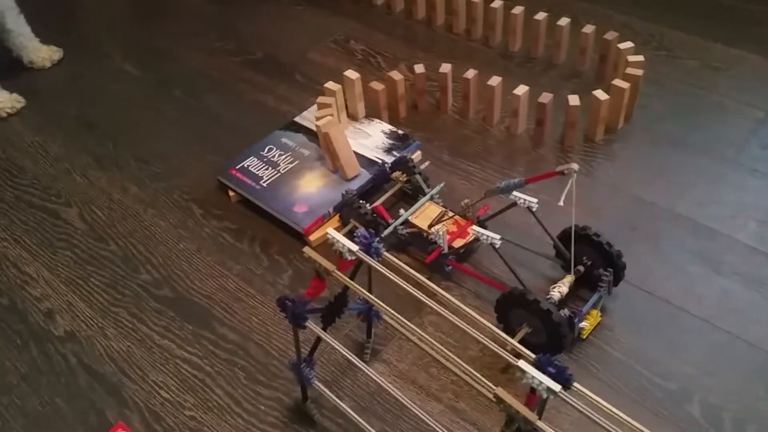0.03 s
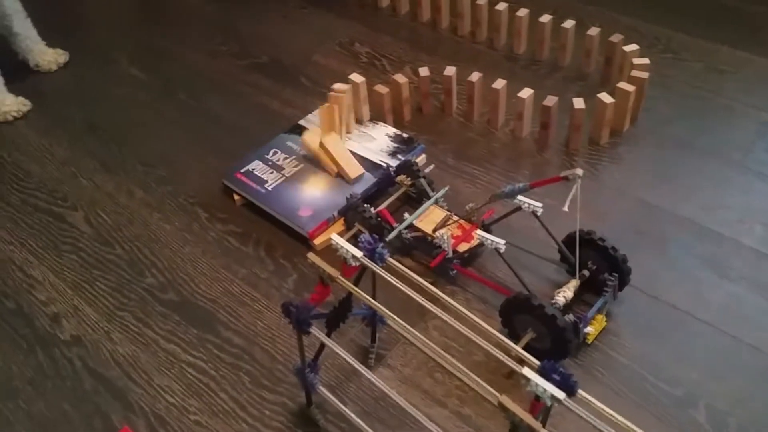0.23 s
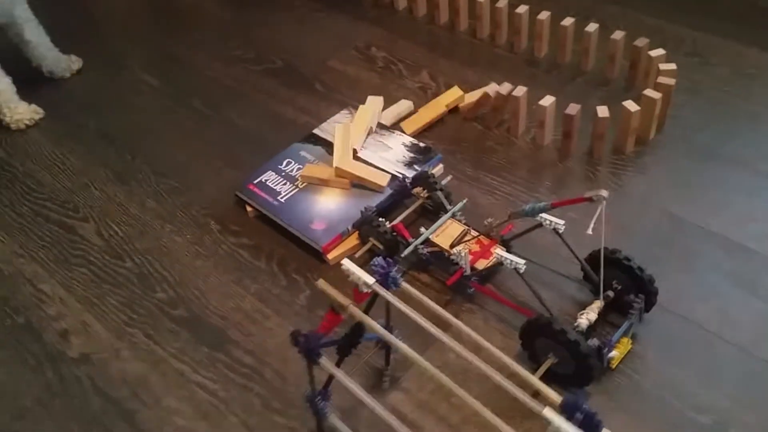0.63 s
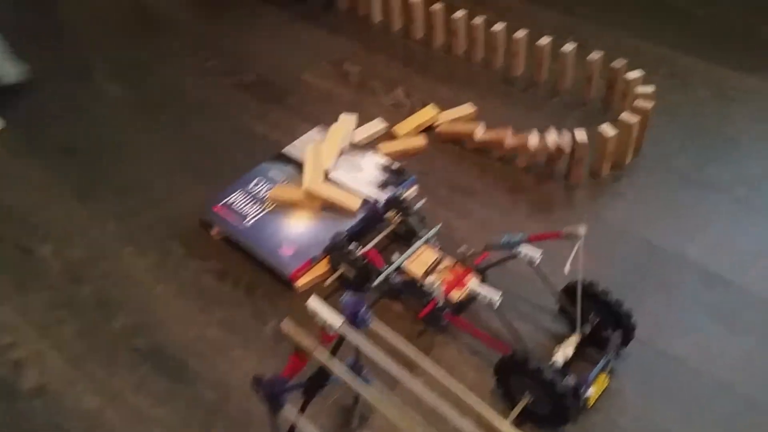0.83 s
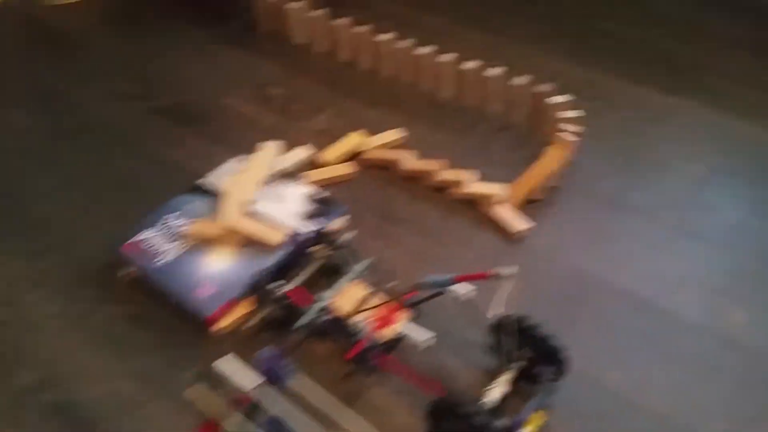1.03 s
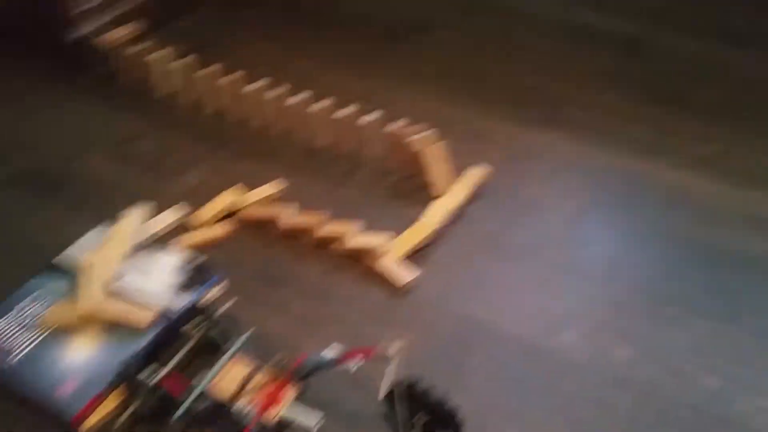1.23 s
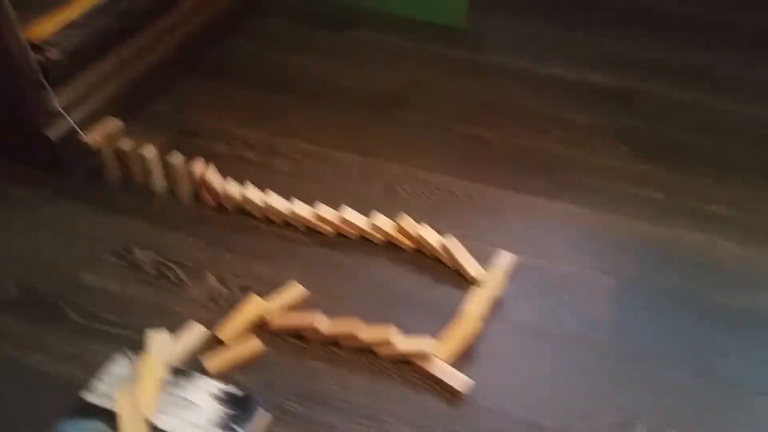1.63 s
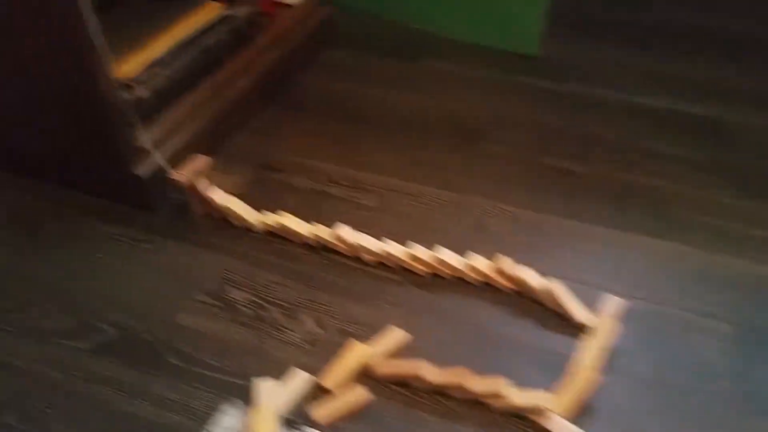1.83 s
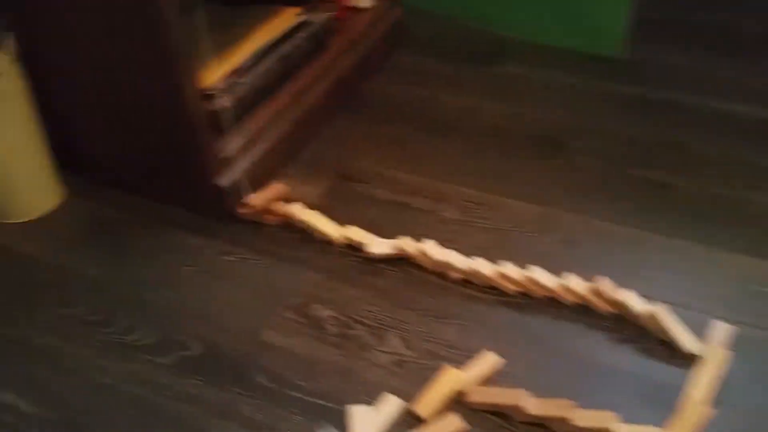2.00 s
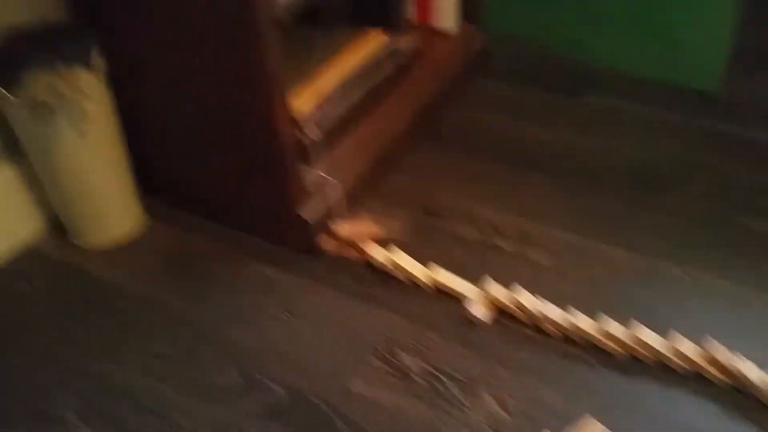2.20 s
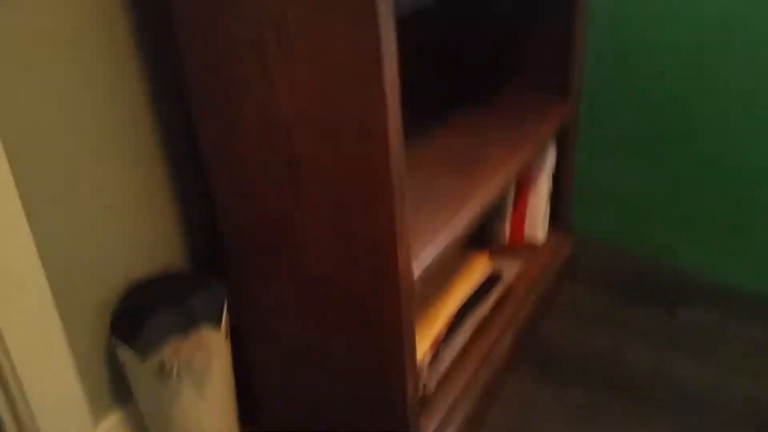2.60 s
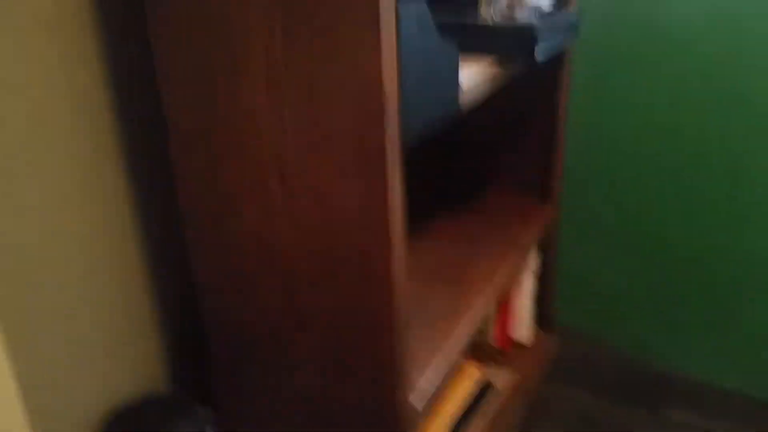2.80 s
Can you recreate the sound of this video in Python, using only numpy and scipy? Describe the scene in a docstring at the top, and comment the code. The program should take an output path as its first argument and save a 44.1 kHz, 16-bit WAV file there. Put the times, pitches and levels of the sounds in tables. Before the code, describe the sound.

A row of wooden dominoes falls with a running clatter and sharp clacks indoors.

```python
"""Wooden blocks topple in a row along a hard floor, set off by a stack that tips over on a book.
Each block hits the next, making a running clatter with single clacks, and bright crashes where several
land together. The book rattles, the floor rings hollow and something small rings thinly in a live room.
The moving camera takes soft knocks at its left microphone opening."""
import sys
import numpy as np
from scipy import signal
from scipy.fft import rfft, irfft, next_fast_len
from scipy.io import wavfile
from scipy.ndimage import uniform_filter1d, map_coordinates

SR = 44100
rng = np.random.default_rng(int(sys.argv[2]) if len(sys.argv) > 2 else 0)


def output_pcm(signal):
    """Save a mono or channel-first signal as 16-bit PCM at the path in sys.argv[1].

    Samples are clipped to [-1, 1] before scaling.
    """
    pcm = np.clip(np.atleast_2d(signal).T, -1, 1) * 32767
    wavfile.write(sys.argv[1], SR, np.round(pcm).astype(np.int16))


N = 130095

# Levels compare rows within one table. ring_s is the time a sound takes to fade by 60 dB.
# loudness of the running clatter: time_s, level_db
CLATTER_LEVELS = [(0, -82), (.24, -68), (.32, -58), (.6, -25.5), (.78, -41.5), (.84, -34.5), (1.0, -35.5),
                  (1.1, -43), (1.25, -34.5), (1.42, -32.5), (1.53, -31.5), (1.62, -31.5), (1.75, -32),
                  (1.82, -45.5), (1.98, -64), (2.06, -61), (2.3, -82), (2.95, -67)]
# tone of the clatter, from bass to treble: frequency_hz, gain_db
CLATTER_TONE = [(40, -35.5), (100, -15.5), (200, 7), (380, 5.5), (620, 3), (950, 4), (1400, 7), (2100, 6.5),
                (3000, -5.5), (4500, -11.5), (7000, -14), (8500, -69), (16000, -16.5)]
# blocks landing together: start_s, rise_s, base_fade_s, then one level_db for each crash band
CRASHES = [(.116, 0.0022, 0.021, -75, -68, -45.5, -43.5, -120),
           (0.167, .03, 0.032, -48, -44, -55, -56, -91),
           (0.237, 0.021, 0.14, -44, -30, -36.5, -46.5, -48.5),
           (0.279, 0.0012, 0.069, -31, -26, -35, -38, -93), (0.397, 0.0019, 0.046, -23, -24, -23, -63, -41),
           (0.461, 0.0071, 0.014, -36.5, -31, -21, -39.5, -42),
           (.511, 0.013, 0.065, -34.5, -37.5, -27.5, -18.5, -26),
           (0.651, 0.0018, 0.031, -48, -33.5, -25, -27, -56),
           (0.707, 0.017, 0.019, -32.5, -28.5, -24.5, -24.5, -28.5),
           (0.887, 0.019, 0.036, -34.5, -33.5, -27, -24, -28.5),
           (1.135, 0.028, 0.034, -35.5, -34, -28.5, -24.5, -32.5),
           (1.226, 0.0033, 0.037, -31, -39, -33.5, -25.5, -31), (1.36, 0.02, 0.02, -46, -41, -37, -44, -71),
           (1.554, 0.001, 0.02, -36, -27.5, -32, -37.5, -74),
           (1.66, 0.0084, 0.032, -48, -29.5, -33.5, -40, -36),
           (1.877, .002, 0.047, -29, -27, -24, -31.5, -63),
           (1.91, 0.0045, 0.018, -24, -28, -24, -24.5, -41),
           (2.14, 0.0014, 0.019, -37.5, -28.5, -27.5, -29.5, -73),
           (2.184, 0.0042, 0.013, -43, -31.5, -24.5, -30, -52.5),
           (2.452, 0.013, .01, -47, -45, -45, -42, -53), (2.467, 0.011, 0.032, -39, -34, -32, -29, -35),
           (2.55, 0.024, 0.015, -49, -39.5, -41, -58, -44),
           (2.757, 0.0032, 0.016, -43.5, -54.5, -53, -49, -61),
           (2.77, 0.0033, 0.023, -47.5, -44, -34, -37, -45),
           (2.863, 0.0057, 0.042, -53.5, -45, -46.5, -58, -60)]
# the five crash bands: frequency_hz
CRASH_BANDS = [450, 1000, 2200, 5000, 11000]
# wooden tone that all crashes share: frequency_hz, gain_db
WOOD_TONE = [(40, -42.5), (130, -27), (220, -5.5), (380, -3.5), (650, -5), (1000, -3.5), (1500, 1),
             (2100, 1.5), (3000, 0.5), (4500, -1), (6700, -0.5), (8200, -10), (10500, -4.5), (13000, -11),
             (16000, -17.5)]
# single blows on a block: start_s, level_db
CLACKS = [(0.283, -11.5), (0.4011, -11.5), (0.4685, -19), (0.5505, -8.5), (0.5635, -9.5), (0.585, -8.5),
          (0.6571, -16), (1.2299, -32), (1.4723, -18), (1.5205, -15), (1.5576, -14), (1.605, -11.5),
          (1.6468, -15.5), (1.88, -18), (1.8926, -10.5), (1.9497, -13.5), (2.1428, -33)]
# the notes inside a typical block's clack: pitch_hz, level_db, ring_s
BLOCK_NOTES = [(1270, -1, 0.02), (1780, -1.5, 0.074), (1968, 2.5, 0.012), (2206, 10.5, 0.017),
               (2970, -3, 0.06), (4680, -7, .025), (6860, -13, 0.045)]
# blocks that land free and ring on: start_s, level_db, pitch_hz
BLOCK_RINGS = [(.284, -24, 2206), (.401, -33, 2280), (.469, -31, 2180), (.55, -18.5, 1950),
               (.55, -32, 4400), (.657, -20, 2190), (1.15, -18.5, 2940), (1.23, -30, 2296),
               (1.882, -22.5, 1332), (1.92, -25.5, 3230), (2.143, -28, 2376), (2.25, -31, 2030),
               (2.472, -24, 2510), (2.475, -22, 3747), (2.58, -35, 2406), (2.776, -30, 2277),
               (2.83, -31.5, 2116), (2.89, -40, 3420)]
# loudness of the stack tumbling on the book: time_s, level_db
TUMBLE_LEVELS = [(0, -47.5), (.045, -62), (.12, -46), (.2, -36.5), (.24, -32.5), (.285, -27), (.33, -29.5),
                 (.4, -33), (.47, -47.5), (.54, -54), (.62, -93)]
# hollow tone of the book: frequency_hz, gain_db
BOOK_TONE = [(60, -37), (200, -17.5), (380, -9.5), (530, -3.5), (630, -0.5), (780, -5.5), (1000, -22.5),
             (1600, -31.5), (4000, -58)]
# taps of the stack on the book: start_s, level_db
BOOK_TAPS = [(.057, -37.5), (.0865, -41), (.1345, -32.5), (0.164, -29.5), (.265, -14.5), (.286, -15)]
# the notes inside a tap on the book: pitch_hz, level_db, ring_s
BOOK_NOTES = [(473, -10, 0.046), (553, 8.5, 0.12), (670, -6.5, 0.1), (777, -4, .03)]
# the floor ringing under falling blocks: start_s, level_db, pitch_hz
FLOOR_BOOMS = [(.33, -25, 309), (.43, -26.5, 271), (.83, -34, 640), (1.0, -34.5, 616), (1.08, -33, 603),
               (1.26, -34, 564), (1.54, -28.5, 203.4), (1.599, -30, 217.3), (1.73, -27.5, 389),
               (1.79, -30.5, 377), (1.885, -21, 319), (1.929, -28, 395), (1.99, -31, 389),
               (2.481, -29, 290), (2.57, -38.5, 311), (2.755, -47, 547), (2.775, -40, 440)]
# thin pings of small hard parts: start_s, level_db, pitch_hz
PINGS = [(.12, -76, 10450), (.28, -53.5, 10700), (.38, -51, 10480), (.465, -49, 10600), (.6, -42, 10800),
         (.77, -45, 10500), (1.15, -32.5, 9920), (1.384, -38, 11630), (1.395, -50.5, 10570),
         (1.441, -43, 11900), (1.468, -40.5, 11600), (1.555, -43, 10770), (1.638, -41, 11400),
         (1.675, -32, 11650), (1.695, -30, 11730), (1.735, -36, 11600), (1.878, -41, 11000),
         (1.915, -44, 10970), (2.143, -61.5, 10660), (2.19, -54.5, 10770)]
# knocks on the camera: start_s, level_db, start_pitch_hz
CAMERA_KNOCKS = [(0.098, -27.5, 216), (1.0, -24, 253), (1.01, -25, 212), (1.061, -12, 323),
                 (1.099, -12.5, 408), (1.113, -25, 231), (1.13, -18.5, 260), (1.163, -20.5, 255),
                 (1.308, -12.5, 386), (1.37, -17.5, 285), (1.43, -8, 344), (1.858, -15.5, 292),
                 (1.964, -20.5, 286), (2.104, -15.5, 497), (2.108, -9.5, 209), (2.283, -35, 220),
                 (2.507, -10.5, 290), (2.53, -8.5, 290), (2.548, -8.5, 323), (2.686, -20, 232),
                 (2.698, -12.5, 280), (2.717, -9, 312), (2.884, -36, 206)]
# tone of the room's low hum: frequency_hz, gain_db
HUM_TONE = [(25, -18.5), (90, 7), (200, -3), (600, -9), (2000, -24.5), (6000, -27), (9000, -69),
            (16000, -28)]
# how long the room echoes: frequency_hz, ring_s
ROOM_ECHO = [(100, 0.18), (500, 0.4), (2000, 0.35), (5000, 0.36), (10000, 0.25), (16000, 0.21)]
# how alike the echo is on left and right: frequency_hz, likeness (1 same, -1 opposite)
ECHO_LIKENESS = [(60, 0.47), (290, 1), (640, 0.91), (1400, -0.41), (3000, 0.16), (15000, -0.21)]
# tone of the left microphone compared with the right: frequency_hz, gain_db
LEFT_MIC_TONE = [(100, 4), (400, 0), (700, 2.5), (1300, -10), (2400, -4.5), (4400, -10), (6500, -11),
                 (8200, -3.5), (11000, 2.5), (16000, -9)]


def clatter():
    """Each block hits the next and then the floor, making a stream of wooden clicks."""
    clicks = lambda: rattle(CLATTER_LEVELS, CLATTER_TONE, per_s=110, spread_db=11, scrape_db=-14.5)
    return from_spots(lambda: in_room(clicks(), direct_db=-6.5), count=2)


def crashes():
    """Several blocks land together: a quick flurry of hits that dies away."""
    out, t = np.zeros((2, N)), np.arange(SR // 3) / SR
    for start_s, rise_s, base_fade_s, *levels_db in CRASHES:
        rise = np.minimum(t / rise_s, 1) ** 0.76
        fade = np.exp(-np.maximum(t - rise_s, 0) / (1.307 * base_fade_s))
        bands = list(zip(CRASH_BANDS, levels_db))

        def tone_db(hz):
            per_octave_db = 10 * np.log10(SR / (hz + 100))  # high octaves share energy over more Hz
            return look_up(bands, hz) + look_up(WOOD_TONE, hz) + per_octave_db

        def flurry():
            hits = rise * fade * random_hits(len(t), per_s=450, spread_db=8.5, scrape_db=-11.5)
            return in_room(shape_tone(hits, tone_db), direct_db=-0.5)

        add(out, start_s, gain(0.76) * from_spots(flurry, count=3))
    return out


def clacks():
    """A sharp blow rings one block; no two blocks are tuned quite alike."""
    out, t = np.zeros((2, N)), np.arange(SR // 10) / SR
    for start_s, level_db in CLACKS:
        ring = strike(BLOCK_NOTES, t, tuning=np.exp(0.049 * rng.normal()))
        add(out, start_s, in_room(gain(level_db - 12) * ring, direct_db=-2))
    return out


def block_rings():
    """A block that is not pinned by its neighbours keeps one rough note for a moment."""
    out, t = np.zeros((2, N)), np.arange(SR // 6) / SR
    for start_s, level_db, pitch_hz in BLOCK_RINGS:
        ring = rough_note(t, pitch_hz, blur_hz=253, ring_s=0.13)
        add(out, start_s, in_room(gain(level_db - 0.5) * ring, direct_db=0.5))
    return out


def book_tumble():
    """The stack rocks and slides on the book with a hollow rattle."""
    rocking = lambda: rattle(TUMBLE_LEVELS, BOOK_TONE, per_s=300, spread_db=5, scrape_db=-8)
    return from_spots(lambda: in_room(rocking(), direct_db=4), count=2)


def book_taps(soften_s=0.0006):
    """The stack gives the book single dull taps; the soft cover slows each blow."""
    out, t = np.zeros((2, N)), np.arange(SR // 10) / SR
    soft_start = 1 - np.exp(-t / soften_s)
    for start_s, level_db in BOOK_TAPS:
        tap = soft_start * strike(BOOK_NOTES, t)
        add(out, start_s, in_room(gain(level_db - 9.5) * tap, direct_db=13.5))
    return out


def floor_booms():
    """The floor rings hollow, at a pitch that depends on where a block lands."""
    out, t = np.zeros(N), np.arange(SR // 3) / SR
    for start_s, level_db, pitch_hz in FLOOR_BOOMS:
        add(out, start_s, gain(level_db - 2) * rough_note(t, pitch_hz, blur_hz=25, ring_s=0.25))
    return out


def pings(flutter_db=8, flutter_per_s=400):
    """Small hard parts are jostled and ring very high, rattling as they do."""
    out, t = np.zeros((2, N)), np.arange(SR // 4) / SR
    for start_s, level_db, pitch_hz in PINGS:
        wobble = map_coordinates(rng.standard_normal(512), [t * flutter_per_s], mode="wrap")
        flutter = normalize(gain(flutter_db * wobble))
        ring = rough_note(t, pitch_hz, blur_hz=300, ring_s=0.2)
        add(out, start_s, in_room(gain(level_db + 1) * flutter * ring, direct_db=0.5))
    return out


def camera_knocks(rise_s=0.003, drop_s=0.0051, end_hz=75.5, top_hz=800):
    """Soft bumps at the left microphone: a few slow vibrations that drop in pitch."""
    out, t = np.zeros(N), np.arange(SR // 12) / SR
    swell = t / rise_s * np.exp(1 - t / rise_s)
    for start_s, level_db, start_pitch_hz in CAMERA_KNOCKS:
        pitch_hz = end_hz + (start_pitch_hz - end_hz) * np.exp(-t / drop_s)
        wave = np.sin(2 * np.pi * np.cumsum(pitch_hz) / SR)
        add(out, start_s, gain(level_db) * swell * wave)
    left = signal.sosfiltfilt(signal.butter(3, top_hz, fs=SR, output="sos"), out)
    return np.array([left, gain(-45) * left])  # only a trace reaches the right side


def room_hum():
    """The quiet room: faint, low noise, different on each side."""
    noises = rng.standard_normal((2, N))
    hum = [normalize(shape_tone(noise, lambda hz: look_up(HUM_TONE, hz))) for noise in noises]
    return gain(-58.5) * np.array(hum)


def in_room(sound, direct_db, max_delay_s=0.00044):
    """A sound reaches both microphones directly and as an echo; higher direct_db seems closer."""
    hz, t, noise = signal.stft(rng.standard_normal((2, SR // 3)), SR, nperseg=256)
    angle = np.arccos(np.clip(look_up(ECHO_LIKENESS, hz), -1, 1))[:, None] / 2
    shares = np.array([np.cos(angle), np.sin(angle)])
    fade = gain(-60 * t / look_up(ROOM_ECHO, hz)[:, None])
    same, opposite = signal.istft(noise * fade * shares, SR, nperseg=256)[1]
    paths = np.array([same + opposite, same - opposite])
    paths /= np.linalg.norm(paths[0])
    arrivals = (rng.random(2) * max_delay_s * SR).astype(int)  # the tiny gap suggests a direction
    paths[[0, 1], arrivals] += gain(direct_db)
    return signal.fftconvolve(sound[None], paths, axes=1)[:, :N] / np.hypot(1, gain(direct_db))


def from_spots(source, count):
    """The same kind of sound from several spots, each with its own path through the room."""
    return sum(source() for _ in range(count)) / np.sqrt(count)


def rattle(levels, tone, per_s, spread_db, scrape_db):
    """A stream of hits takes on an object's tone, growing louder and softer over time."""
    time_s, level_db = np.transpose(levels)
    loudness = gain(np.interp(np.arange(N) / SR, time_s, level_db))
    hits = random_hits(N, per_s, spread_db, scrape_db)
    return loudness * normalize(shape_tone(hits, lambda hz: look_up(tone, hz)))


def random_hits(samples, per_s, spread_db, scrape_db):
    """Clicks of uneven strength at random moments, over a faint scraping."""
    clicks = (rng.random(samples) < per_s / SR) * rng.choice([-1, 1], samples)
    strength = gain(spread_db * rng.uniform(-0.87, 1, samples))
    scrape = gain(scrape_db) * rng.standard_normal(samples)
    return normalize(normalize(clicks * strength) + scrape)


def strike(notes, t, tuning=1, rise_s=0.00017):
    """A struck object rings with several fading notes, a little stronger or weaker at each blow."""
    ring = 0
    for pitch_hz, level_db, ring_s in notes:
        fade = gain(level_db + rng.normal(0, 0.92) - 60 * t / ring_s)
        ring += fade * np.sin(2 * np.pi * pitch_hz * tuning * t)
    return ring * (1 - np.exp(-(t / rise_s) ** 2))


def rough_note(t, pitch_hz, blur_hz, ring_s):
    """One fading note whose wave drifts at random, blurring its pitch."""
    drift = np.cumsum(rng.standard_normal(len(t))) * np.sqrt(2 * np.pi * blur_hz / SR)
    drift = uniform_filter1d(drift, size=max(1, int(SR / (2 * blur_hz))))
    loudness = gain(-60 * t / ring_s) * (1 - np.exp(-t / 0.002))
    return loudness * np.sin(2 * np.pi * pitch_hz * t + drift)


def shape_tone(sound, tone_db, size=2048):
    """Turn each frequency up or down by tone_db(hz)."""
    hz = np.fft.rfftfreq(size, 1 / SR)
    cepstrum = irfft(np.log(gain(tone_db(hz))))
    # folding this onto its first half makes the filter ring after a hit, never before
    cepstrum[1:size // 2] *= 2
    cepstrum[size // 2 + 1:] = 0
    click_response = irfft(np.exp(rfft(cepstrum)))
    return signal.fftconvolve(sound, click_response)[:len(sound)]


def look_up(table, hz):
    """Read between the rows of a frequency table, spacing them by octaves."""
    row_hz, values = np.transpose(table)
    return np.interp(np.log(hz + 1), np.log(row_hz + 1), values)


def gain(db):
    """Turn decibels into a multiplier."""
    return 10 ** (np.asarray(db) / 20)


def normalize(sound):
    """Scale a sound to an average (rms) strength of 1."""
    return sound / np.sqrt(np.mean(sound ** 2) + 1e-20)


def add(out, start_s, sound):
    """Mix a sound into out, beginning at start_s."""
    first = max(0, round(start_s * SR))
    out[..., first:first + sound.shape[-1]] += sound[..., :max(0, N - first)]


def scene(bass_cut_hz=132.5):
    """Mix it all: small blocks give off little bass, and sound duller on the left."""
    blocks = book_tumble() + book_taps() + clatter() + crashes() + clacks()
    blocks += block_rings() + floor_booms() + pings()
    left, right = signal.sosfilt(signal.butter(2, bass_cut_hz, "high", fs=SR, output="sos"), blocks)
    left = shape_tone(left, lambda hz: look_up(LEFT_MIC_TONE, hz))
    return np.array([left, right]) + camera_knocks() + room_hum()


def record(dry, top_hz=15900):
    """The camera keeps no treble above top_hz."""
    size = next_fast_len(N + SR // 2)
    kept = np.fft.rfftfreq(size, 1 / SR) < top_hz
    return irfft(rfft(dry, size) * kept, size)[:, :N]


dry = scene()
out = record(dry)
output_pcm(out)
```